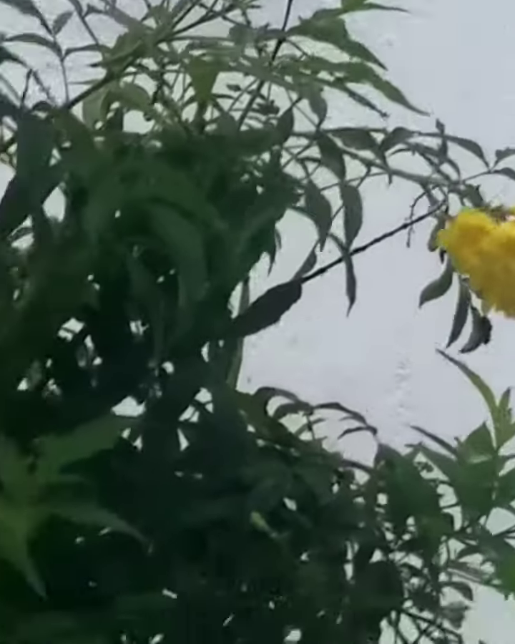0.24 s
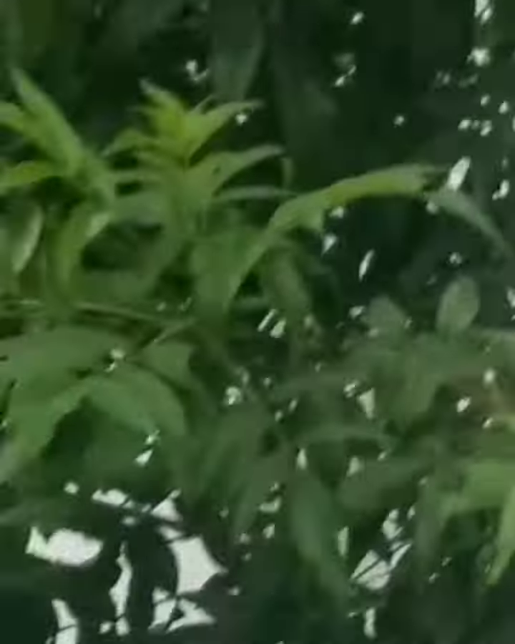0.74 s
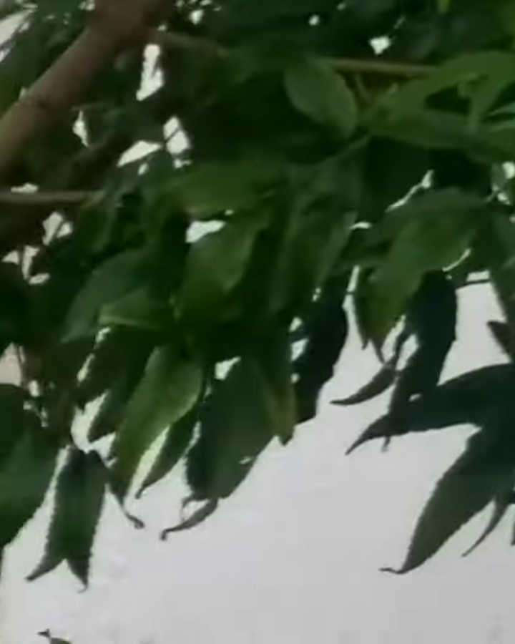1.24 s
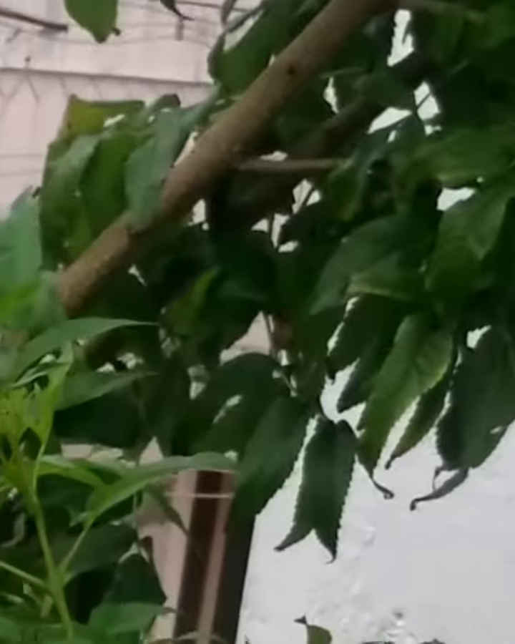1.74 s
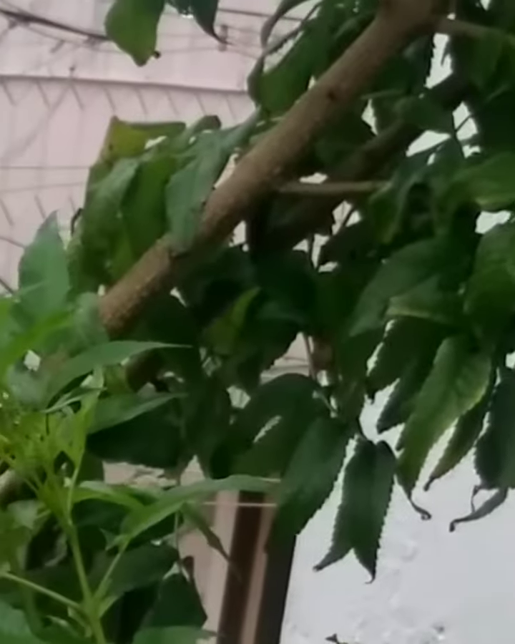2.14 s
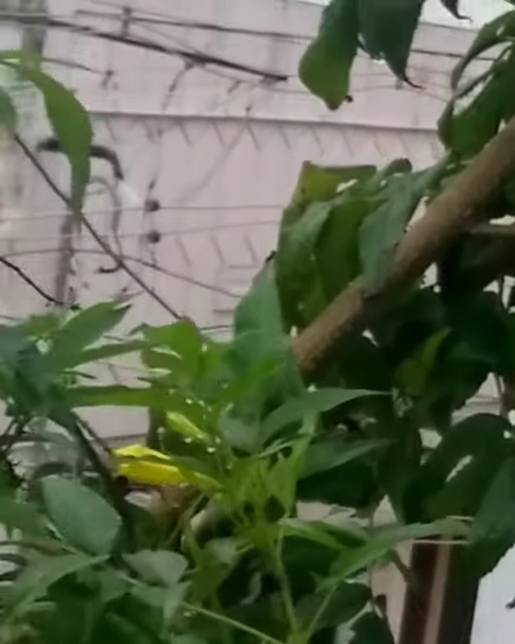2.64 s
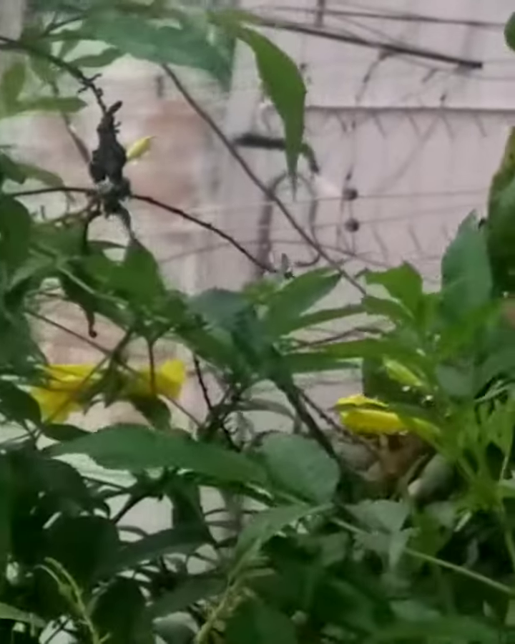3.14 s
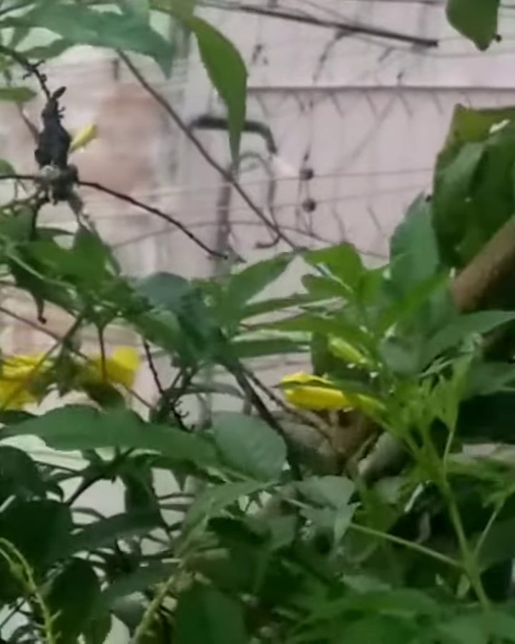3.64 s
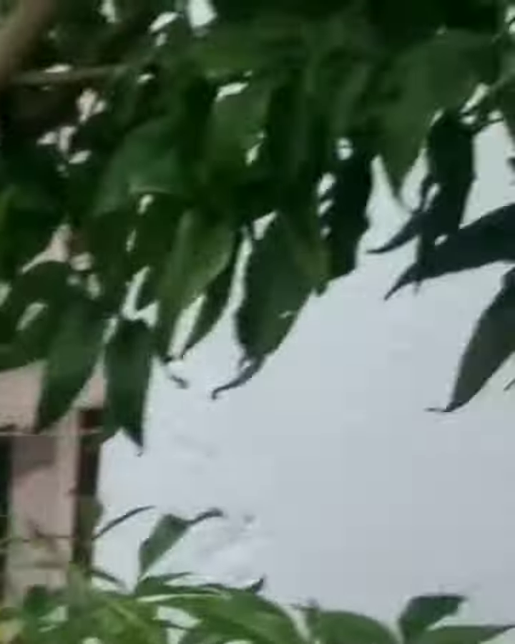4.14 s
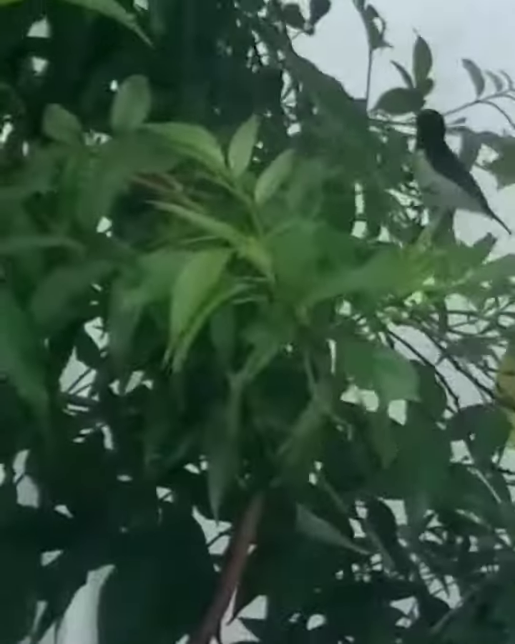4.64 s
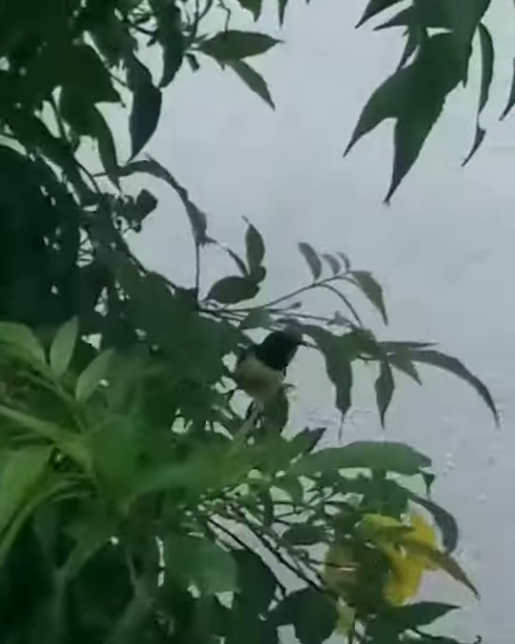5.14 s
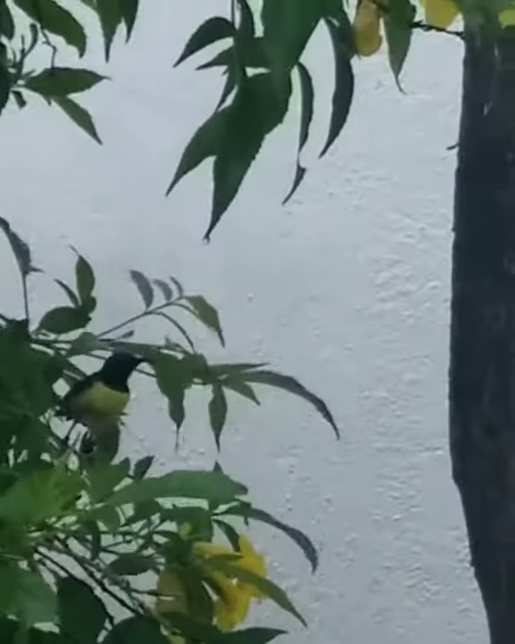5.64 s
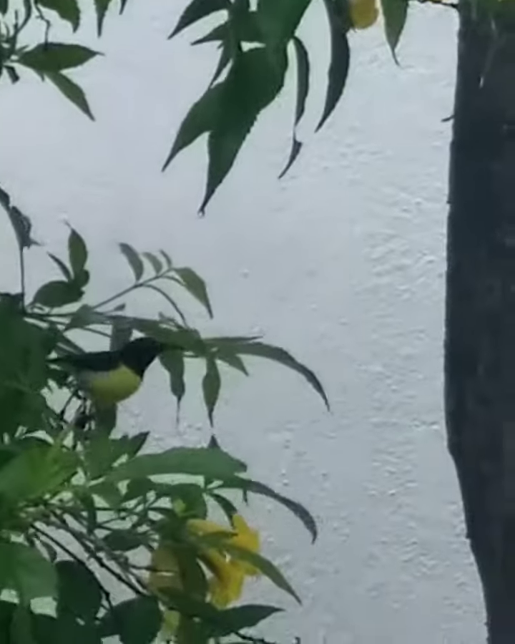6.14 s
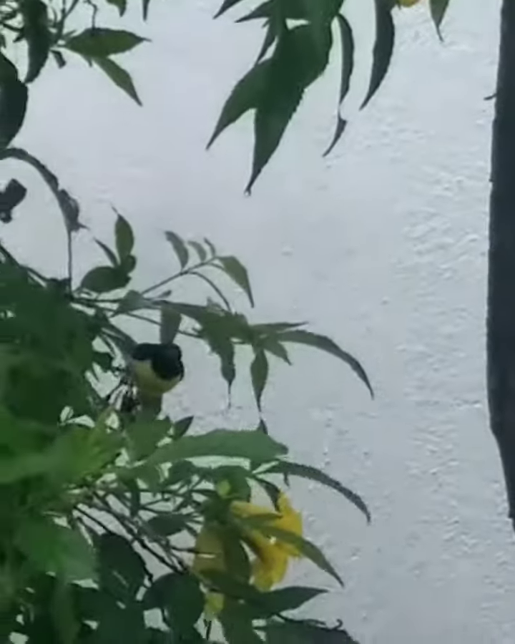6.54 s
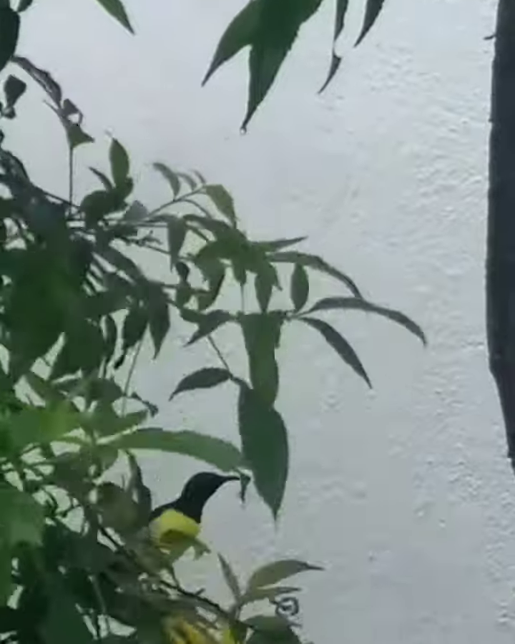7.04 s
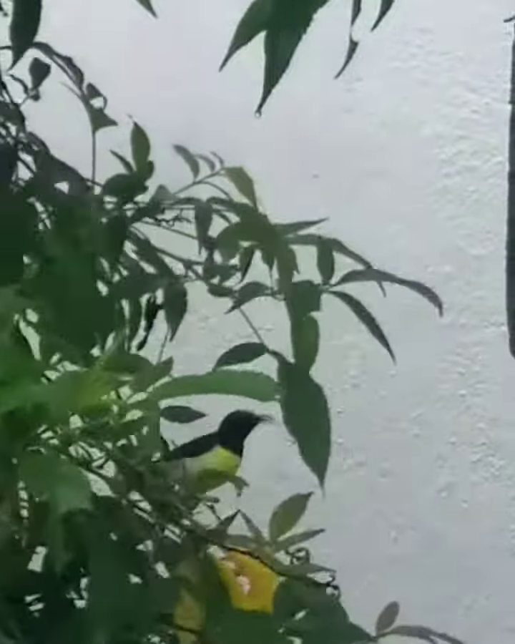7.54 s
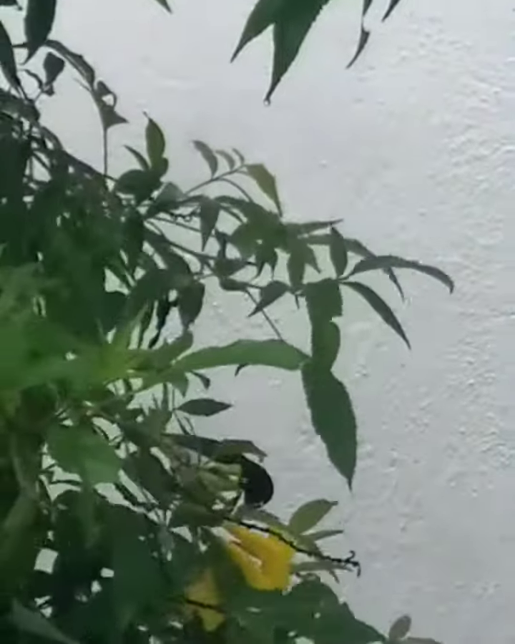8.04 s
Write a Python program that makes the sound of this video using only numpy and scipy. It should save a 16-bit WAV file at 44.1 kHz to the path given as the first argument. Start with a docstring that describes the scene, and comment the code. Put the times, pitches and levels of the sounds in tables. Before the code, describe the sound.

A sunbird calls close by in a walled yard over a soft, low town hum. Each chip is loud, very high and short, a raspy flick into a falling whistle with a slight echo. The first comes right at the start. Very faint, distant dog yelps follow at about 1 and 1.4 seconds, then a barely audible insect trill and two thin peeps from another bird. A second chip sounds at 3 seconds, followed by a faint, far horn toot. A quick pair of chips comes at 4.5 and 4.8 seconds, and two more distant yelps near 5.5 and 5.8. At about 6.3 seconds a finger slides beside the microphone on the left, a harsh hiss trailing off in softer rubs, while the horn toots again. A last faint yelp precedes two chips at 7.4 and 7.7 seconds. The hum swells slightly around each loud sound.

```python
"""A sunbird chips from a shrub in a walled yard: fast flicks, then a falling whistle.
Far off a dog yelps, an insect trills and another bird peeps. A second chip at 3 s, a far horn toot,
two chips near 4.6 s, more yelps. Near 6.5 s a finger slides hissing over the case by the left
microphone and the horn toots again; a last yelp and two chips follow. Throughout, a noise
suppressor lets the town's hum swell around each loud sound."""
import sys
import numpy as np
from scipy import signal
from scipy.fft import rfft, irfft, next_fast_len
from scipy.io import wavfile
from scipy.ndimage import uniform_filter1d

SR = 44100
rng = np.random.default_rng(int(sys.argv[2]) if len(sys.argv) > 2 else 0)


def wav_record(signal):
    """Record a signal, one row per channel, as 16-bit PCM in the file named by sys.argv[1]."""
    frames = np.transpose(np.atleast_2d(signal))
    bounded = np.clip(frames, -1, 1)
    # unit amplitude maps onto the largest positive 16-bit level
    quanta = np.round(bounded * 32767).astype(np.int16)
    wavfile.write(sys.argv[1], SR, quanta)


N = 366030
TIME_S, BINS_HZ = np.arange(N) / SR, np.fft.rfftfreq(N, 1 / SR)
SIDES = np.array([[1], [-1]])  # left, right

# Sunbird chips. Each row: time of top pitch in seconds, gain in dB, top and held pitch in Hz, fall time
# and length in seconds, flick gain in dB, closing upturn in Hz, side tone gain in dB, echo delay factor,
# late echo gain and its leftward lean in dB.
CHIPS = [ (0.128, -10.5, 7112, 6053, 0.063, 0.073, -15, -1, -35, 1.05, -3, -1),
         (3.014, -5, 7290, 6273, .018, 0.075, -21, 146, -49.5, .83, -0.5, -2),
         (4.548, -9, 7300, 6130, 0.024, 0.071, -14, 322.5, -30, 1.5, -1, -3.5),
         (4.75, -9, 7185, 6020, 0.02, 0.074, -10, 258, -20.5, 1.6, -3.5, -5),
         (7.401, -7, 7300, 6127, 0.013, 0.075, -14, 602.5, -48.5, 0.95, -7.5, -2.5),
         (7.721, -5.5, 7327, 6190, 0.014, 0.0596, -15, 185, -31.5, .8, -6, -1.5), ]
# Ground, trunk and wall echoes. Each row: base delay and extra delay on the right in seconds,
# left and right gain in dB.
ECHOES = [(.0041, .00022, -10.5, -13.5), (.0078, -.00031, -2, -2), (0.0133, .00037, -9.5, -21),
          (0.02, -.00009, -18.5, -21), (0.0262, .00024, -26, -17.5), (0.04, -.0002, -21, -18),
          (0.055, .00008, -26.5, -16)]
# Reverberation of yard and foliage. Each row: frequency in Hz, T60 in seconds.
YARD_T60 = [(4000, 0.79), (6500, 0.64), (9000, 0.1), (15000, .2)]
FOLIAGE_T60 = [(4000, 0.22), (6500, 0.2), (9000, 0.048), (15000, 0.14)]
# Overall tone of the chips: lows cut, dip near 8 kHz. Each row: frequency in Hz, gain in dB.
CHIP_EQ = [(2500, -31.5), (3550, -24), (4150, -1), (7650, -2), (8150, -7.5), (11000, 3), (13000, 3),
           (15000, 0)]
# Bird's stereo lean. Each row: frequency in Hz, left boost and right cut in dB.
BIRD_LEAN = [(4200, -1.5), (5300, -2.5), (6200, -0.3), (7400, 0.5), (10000, 3)]
# Finger strokes. Each row: start and hold in seconds, left and right gain in dB, decay in dB per second.
STROKES = [(5.297, 0.92, -74.5, -96, 46), (6.316, 0.11, -31, -51.5, 53), (6.48, 0.014, -35.5, -71, 123),
           (6.598, 0.005, -41, -56, 170), (6.752, 0.072, -44.5, -53.5, 50), (7.164, 0.45, -53.5, -60.5, 49)]
# Skin friction spectrum, and its extra filter on the right. Each row: frequency in Hz, gain in dB.
FRICTION_SPECTRUM = [(40, -59), (130, -18.5), (500, -30), (2000, -29), (3700, -27), (4150, -8.5),
                     (5000, -5.5), (7600, -1.5), (8300, -7.5), (11000, -8.5), (12200, -18), (15500, -24.5)]
FRICTION_RIGHT_EQ = [(1000, -4), (4000, 5.5), (7700, -1), (8400, -14.5), (15000, -9)]
# Short, soft noise swells. Each row: start and length in seconds, gain in dB, tilt in dB per octave,
# leftward lean in dB.
NOISE_SWELLS = [(0.111, 0.16, -67, -6.5, -2), (4.769, 0.17, -61, -1, -4), (6.73, 0.06, -61.5, 12, 1.5)]
# Their spectrum before tilt. Each row: frequency in Hz, gain in dB.
SWELL_SPECTRUM = [(40, -39.5), (200, -5), (1000, -5), (2500, -2), (3400, -12.5), (5000, -12.5), (9000, -65)]
# Dog yelps. Each row: start in seconds, gain in dB, starting pitch in Hz, roughness factor.
YELPS = [(1.055, -64, 1050, 0.55), (1.395, -66, 1192, 1.04), (5.48, -62, 1057, 0.67),
         (5.809, -62.5, 1177, 0.6), (7.326, -65, 1153, 0.26)]
# Horn toots. Each row: start in seconds, gain in dB.
TOOTS = [(3.245, -60), (6.65, -60)]
# Horn timbre. Each row: harmonic number, gain in dB.
HORN_HARMONICS = [(1, -9.5), (2, -4.5)]
# Far bird's peeps. Each row: start in seconds, gain in dB, starting pitch in Hz.
PEEPS = [(1.764, -74.5, 6900), (2.103, -70.5, 6400)]
# Traffic tones. Each row: peak time and spread in seconds, gain in dB, pitch and width in Hz.
TRAFFIC_TONES = [(2.931, 0.11, -72.5, 1920, 35), (3.301, 0.15, -69.5, 260.4, 16),
                 (3.51, 0.16, -68, 1920, 110)]
# Motor whines. Each row: pitch in Hz, gain in dB.
WHINES = [(400, -80.5), (1965, -78), (2168, -79)]
# Spectra of town hum and airy hiss. Each row: frequency in Hz, gain in dB.
HUM_SPECTRUM = [(25, -35), (53, -25), (80, -9), (160, -1.5), (310, -8), (420, -7.5), (800, -8.5),
                (1200, -10.5), (2100, -12.5), (2750, -14), (3300, -16), (3900, -21), (4400, -43.5),
                (8000, -71.5)]
HISS_SPECTRUM = [(3600, -32), (4150, -4.5), (5500, -5.5), (7400, -3.5), (8400, -16.5), (10000, -24),
                 (13000, -48)]
# Slow swell of the hum. Each row: time in seconds, gain in dB.
HUM_SWELL = [(0, -72), (2.8, -70), (3.4, -68.5), (4.3, -71), (5.85, -66.5), (6.3, -67.5), (8.3, -70)]
# Stereo likeness of the hum. Each row: frequency in Hz, left-right correlation.
HUM_CORRELATION = [(60, 0.62), (150, 1), (300, 0.74), (600, 0.14), (1200, 0.16), (2200, 0.59), (3000, 0.83),
                   (3700, 1)]
# Ringing peaks in the hiss. Each row: frequency in Hz, boost in dB.
HISS_RINGS = [(4533, 7.5), (4721, 9), (5652, 7.5), (5889, 8), (6255, 6.5), (6670, 8.5), (7235, 4.5),
              (7655, 6)]


def sunbird(rise_s=.011, lead_s=.0112, spacing_s=.005, step_db=-4, late_s=.035, smear_s=.022):
    """Chips of five growing flicks and a whistle; foliage smears and dulls the late echoes."""
    dry, echoes = np.zeros(N), np.zeros((2, N))
    jitter = .003 * wander(830) + .0032 * wander(120)
    for (at_s, db, top_hz, held_hz, fall_s, length_s, flick_db, upturn_hz, side_db,
         delay_factor, late_db, lean_db) in CHIPS:
        chip, start_s = np.zeros(SR // 2), at_s - .1
        note = whistle(top_hz, held_hz, upturn_hz, rise_s, fall_s, length_s, side_db,
                       jitter[round(at_s * SR):])
        add(chip, at_s - start_s - rise_s, gain_of(db) * note)
        for k in range(5):  # latest first; earlier flicks end lower
            sweep = gain_of(db + flick_db + k * step_db) * flick(6900 - 250 * k)
            add(chip, at_s - start_s - lead_s - k * spacing_s, sweep)
        add(dry, start_s, chip)
        smear = rng.standard_normal(SR)[:round(smear_s * SR)]
        blurred = gain_of(late_db) * lowpass(signal.oaconvolve(chip, smear / np.linalg.norm(smear)), 8200)
        for delay_s, extra_s, left_db, right_db in ECHOES:
            echo, pan_db = (blurred, lean_db) if delay_s > late_s else (chip, 0)
            arrival_s = start_s + delay_s * delay_factor
            add(echoes[0], arrival_s, gain_of(left_db + pan_db) * echo)
            add(echoes[1], arrival_s + extra_s, gain_of(right_db - pan_db) * echo)
    flicker = 1 + .32 * np.array([wander(70), wander(70)])
    scatter = gain_of(-7.5) * reverb(dry, FOLIAGE_T60, onset_s=.004)
    yard = gain_of(-26) * flicker * reverb(dry, YARD_T60)
    bird = shaped(dry + echoes + scatter + yard, CHIP_EQ)
    return irfft(rfft(bird) * gain_of(-5 + SIDES * lookup(BIRD_LEAN, BINS_HZ)), N)


def whistle(top_hz, held_hz, upturn_hz, rise_s, fall_s, length_s, side_db, jitter,
            start_hz=4900, side_hz=5150, upturn_s=.02, release_s=.011):
    """The syrinx whips up, sinks to a held note and turns up; its other side sounds briefly below."""
    t = np.arange(-rise_s, length_s, 1 / SR)
    settled, jitter = ramp(t / length_s * 2), jitter[:len(t)]
    fall_shape = 1.15 + 16 * fall_s  # slower falls linger at the top
    hz = held_hz + (top_hz - held_hz) * np.exp(-(np.maximum(t, 0) / fall_s) ** fall_shape)
    hz -= (top_hz - start_hz) * (np.minimum(t, 0) / rise_s) ** 2
    hz += upturn_hz * ramp(1 + (t - length_s) / upturn_s)
    phase = phase_of(hz * (1 + jitter * (1 - .33 * settled)))
    flutter_db = 3 * (1 - settled) * (np.clip(wander(240)[:len(t)], -2, 1) - .5)
    envelope = ramp((t + rise_s) / rise_s) ** .6 * ramp((length_s - t) / release_s)
    envelope *= gain_of(flutter_db - 1.51 * (4.5 - settled))
    side = gain_of(side_db) * np.exp(-((t - .049) / .011) ** 2) * np.sin(phase * side_hz / held_hz)
    octave = gain_of(-41) * np.exp(-t / .048) * np.sin(2 * phase + 1.1 * unit_rms(jitter))
    air = gain_of(-12) * np.exp(-(t + rise_s) / .0085) * rasp(len(t))
    return envelope * (np.sin(phase) + octave + side + air)


def flick(high_hz, low_hz=4200, length_s=.0075):
    """Fast, raspy upsweep as the syrinx starts, randomly detuned."""
    u = progress(length_s)
    phase = phase_of((low_hz + (high_hz - low_hz) * u) * rng.uniform(.94, 1.15))
    tone = np.sin(phase) + gain_of(-36) * np.sin(2 * phase)
    return np.sin(np.pi * u) * (tone + gain_of(-5) * rasp(len(u)))


def rasp(size):
    """Turbulent air in the syrinx, mostly 4 to 7.5 kHz."""
    spectrum = [(3300, -43), (4100, -4), (5600, 2.5), (7400, 0), (8600, -17.5), (15000, -32.5)]
    colour_db = lookup(spectrum, np.fft.rfftfreq(size, 1 / SR))
    return unit_rms(irfft(rfft(rng.standard_normal(size)) * gain_of(colour_db), size))


def finger_slide(press_s=.18, fizz_hz=10980):
    """Skin rubs the case on the left: friction noise follows each stroke's force, duller as it eases."""
    power = np.zeros((2, N))
    for start_s, hold_s, left_db, right_db, decay_db_per_s in STROKES:
        easing_s = np.maximum(TIME_S - start_s - press_s - hold_s, 0)
        force = ramp((TIME_S - start_s) / press_s) ** 1.2 * gain_of(-decay_db_per_s * easing_s)
        power += (gain_of([[left_db], [right_db]]) * force) ** 2
    left = noise(FRICTION_SPECTRUM)
    right = unit_rms(shaped(noise(FRICTION_SPECTRUM), FRICTION_RIGHT_EQ))
    friction = np.array([left, right])
    body = lowpass(friction, fizz_hz)
    brightness = np.sqrt(power[0] / power[0].max() + 1e-12) ** .26
    grain_db = .35 * wander(120) + .84 * wander(16)
    return (body + brightness * (friction - body)) * np.sqrt(power) * gain_of(grain_db)


def noise_swells():
    """Short, soft swells of noise: a low hum swell under the first chip, then two faint rustles."""
    out = np.zeros((2, N))
    for start_s, length_s, db, tilt_db_per_oct, lean_db in NOISE_SWELLS:
        spectrum = [(hz, band_db + tilt_db_per_oct * np.log2(hz / 40)) for hz, band_db in SWELL_SPECTRUM]
        u = (TIME_S - start_s) / length_s
        envelope = ramp(u / .16) * ramp((1 - u) / .6)
        out += gain_of(db + lean_db * SIDES) * envelope * np.array([noise(spectrum), noise(spectrum)])
    return out


def dog(length_s=.26, sag=.13, wobble=.088, growl_hz=200):
    """Hoarse, sagging yelps; throat flutter adds side bands."""
    out, jitter, u = np.zeros(N), wobble * wander(287), progress(length_s)
    for start_s, db, hz, roughness in YELPS:
        growl = 1 + 1.4 * roughness * np.sin(2 * np.pi * growl_hz * u * length_s)
        phase = phase_of(hz * (1 + roughness * (jitter[round(start_s * SR):][:len(u)] - sag * u)))
        envelope = gain_of(db - 3 * u) * signal.windows.tukey(len(u), .2)
        add(out, start_s, envelope * growl * (np.sin(phase) + gain_of(-8) * np.sin(2 * phase)))
    return out


def horn(length_s=.29, pitch_hz=730, sag=.015):
    """Wavering, fading toots of two harmonics."""
    out, waver, u = np.zeros(N), .0059 * wander(60.2), progress(length_s)
    for start_s, db in TOOTS:
        phase = phase_of(pitch_hz * (1 + sag * (.5 - u) + waver[round(start_s * SR):][:len(u)]))
        tone = sum(gain_of(harmonic_db) * np.sin(k * phase) for k, harmonic_db in HORN_HARMONICS)
        add(out, start_s, gain_of(db - 8 * u) * signal.windows.tukey(len(u), .05) * tone)
    return out


def far_bird(length_s=.076, sag=.13):
    """Thin sine peeps that sag in pitch."""
    out, u = np.zeros(N), progress(length_s)
    for start_s, db, hz in PEEPS:
        add(out, start_s, gain_of(db) * np.sin(np.pi * u) * np.sin(phase_of(hz * (1 - sag * u))))
    return out


def between_houses(x):
    """A far sound plus its reverberation between houses."""
    return gain_of(-1) * x + gain_of(-3) * reverb(x, [(500, .74), (3000, .17)])


def insect(start_s=1.42, length_s=1.65, fade_s=.208, pitch_hz=4370, rise_hz_per_s=135, throb_hz=9):
    """One faint, throbbing trill that creeps up in pitch."""
    t = TIME_S - start_s
    envelope = gain_of(-75) * ramp(t / fade_s) * ramp((length_s - t) / fade_s)
    throb = 1 + .33 * np.sin(2 * np.pi * throb_hz * TIME_S + wander(2))
    return envelope * throb * narrow_noise(pitch_hz + rise_hz_per_s * t, width_hz=130)


def traffic():
    """Fuzzy hums and squeals of far traffic, swelling and fading."""
    return sum(gain_of(db) * np.exp(-((TIME_S - peak_s) / spread_s) ** 2) * narrow_noise(hz, width_hz)
               for peak_s, spread_s, db, hz, width_hz in TRAFFIC_TONES)


def motors(drift_hz=13, waver_db=2.03):
    """Thin, wavering whines of distant motors."""
    return sum(gain_of(db + waver_db * wander(3.1)) * np.sin(phase_of(hz + drift_hz * wander(13)))
               for hz, db in WHINES)


def town_hum(ring_width_hz=28):
    """Low hum under a thin, faintly ringing hiss that swells a little with it."""
    common, separate = rfft(noise(HUM_SPECTRUM)), rfft(noise(HUM_SPECTRUM))
    likeness = lookup(HUM_CORRELATION, BINS_HZ)
    hum = irfft(np.array([common, likeness * common + np.sqrt(1 - likeness ** 2) * separate]), N)
    rings_db = sum(db / (1 + ((BINS_HZ - hz) / ring_width_hz) ** 2) for hz, db in HISS_RINGS)
    hiss = np.array([noise(HISS_SPECTRUM), noise(HISS_SPECTRUM)])
    hiss = unit_rms(irfft(rfft(hiss) * gain_of(rings_db), N))
    swell_db = np.interp(TIME_S, *np.transpose(HUM_SWELL))
    hum *= gain_of(4 + swell_db + .6 * wander(12) + .22 * SIDES)
    hiss *= gain_of(-69.5 + .56 * (swell_db - swell_db.mean()) + SIDES)
    return hum + hiss


def reverb(x, t60_table, onset_s=.013):
    """Diffuse stereo tail, each band decaying at its own rate."""
    hz, t, bands = signal.stft(rng.standard_normal((2, SR)), SR, nperseg=256)
    tail = signal.istft(bands * gain_of(-60 * t / lookup(t60_table, hz)[:, None]), SR, nperseg=256)[1]
    tail *= ramp(np.arange(tail.shape[1]) / SR / onset_s)
    return signal.fftconvolve(x[None], tail / np.linalg.norm(tail[0]), axes=1)[:, :N]


def narrow_noise(hz, width_hz):
    """Noise band round a pitch, independent left and right."""
    phase = phase_of(hz * np.ones(N))
    sine, cosine = np.sin(phase), np.cos(phase)
    return np.array([wander(width_hz) * sine + wander(width_hz) * cosine for _ in range(2)])


def wander(rate_hz):
    """Smooth random curve, rms 1."""
    step = max(int(SR / rate_hz / 20), 1)
    size = next_fast_len(N // step + 2)
    rolloff = np.exp(-(np.fft.rfftfreq(size, step / SR) / rate_hz) ** 2)
    slow = irfft(rfft(rng.standard_normal(size)) * rolloff, size)
    return unit_rms(np.interp(np.arange(N) / step, np.arange(size), slow))


def noise(spectrum):
    """Coloured noise, rms 1."""
    return unit_rms(shaped(rng.standard_normal(N), spectrum))


def shaped(x, spectrum):
    """Filters by a spectrum table."""
    return irfft(rfft(x) * gain_of(lookup(spectrum, BINS_HZ)), N)


def lowpass(x, hz):
    """Steep, zero-phase low-pass."""
    return signal.sosfiltfilt(signal.butter(6, hz, fs=SR, output="sos"), x)


def lookup(table, hz):
    """Interpolates on a log-frequency axis."""
    table_hz, values = np.transpose(table)
    return np.interp(np.log(hz + 1), np.log(table_hz + 1), values)


def add(mix, start_s, sound):
    """Mixes a sound in place."""
    part = mix[max(round(start_s * SR), 0):][:len(sound)]
    part += sound[:len(part)]


def phase_of(hz):
    """Pitch curve to radians."""
    return 2 * np.pi * np.cumsum(hz) / SR


def progress(length_s):
    """Linear 0 to 1 over a length."""
    return np.arange(0, length_s, 1 / SR) / length_s


def ramp(x):
    """Smooth step, 0 to 1."""
    return np.sin(np.pi / 2 * np.clip(x, 0, 1)) ** 2


def gain_of(db):
    """dB to amplitude."""
    return 10 ** (np.asarray(db) / 20)


def unit_rms(x):
    """Scales to rms 1."""
    return x / np.sqrt(np.mean(x ** 2) + 1e-20)


def level_db(x, window_s):
    """Smoothed power of both channels."""
    return 10 * np.log10(abs(uniform_filter1d((x ** 2).mean(0), int(window_s * SR))) + 1e-12)


def openness(x, shut_db, open_db, lag_s=.012):
    """Suppressor opening for a band, 0 to 1."""
    heard_db = np.interp(TIME_S - lag_s, TIME_S, level_db(x, window_s=.04))
    return ramp((heard_db - shut_db) / (open_db - shut_db))


def suppressor(x, hum_hz=3000, treble_hz=8300, depth_db=8.5, linger_db=3, linger_s=.23):
    """Gain rises with loud sounds, the treble on its own, and falls back slowly on the hum."""
    body, hum = lowpass(x, treble_hz), lowpass(x, hum_hz)
    treble = x - body
    opening = openness(x, shut_db=-61, open_db=-38)
    treble_opening = openness(treble - lowpass(treble, treble_hz), shut_db=-68, open_db=-45)
    pole = np.exp(-1 / (linger_s * SR))
    lingering = signal.lfilter([1 - pole], [1, -pole], opening)
    body += hum * (gain_of(linger_db * lingering) - 1)
    return body * gain_of(depth_db * opening) + treble * gain_of(depth_db * treble_opening)


def scene(left_lag_s=.00015):
    """All sources at two microphones, the left slightly late."""
    near = sunbird() + noise_swells()
    far = between_houses(dog() + horn() + far_bird()) + insect() + motors() + traffic()
    left, right = near + far + finger_slide() + town_hum()
    return np.array([irfft(rfft(left) * np.exp(-2j * np.pi * BINS_HZ * left_lag_s), N), right])


def record(dry, limit_db=-19, limit_slope=.46, cutoff_hz=15800):
    """Noise suppressor, soft limiter on the chips, band limit."""
    opened = suppressor(dry)
    excess_db = np.maximum(level_db(opened, window_s=.03) - limit_db, 0)
    limited = opened * gain_of(-limit_slope * uniform_filter1d(excess_db, size=500))
    taps = signal.firwin(511, cutoff_hz, window=("kaiser", 9), fs=SR)
    return signal.oaconvolve(limited, taps[None], "same")


dry = scene()
out = record(dry)
wav_record(out)
```